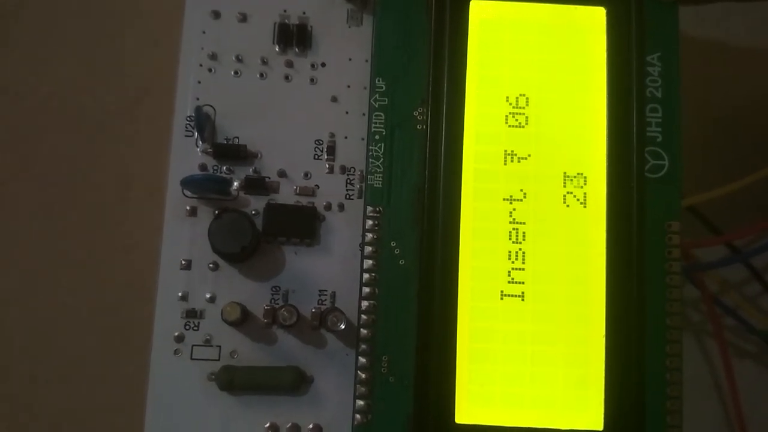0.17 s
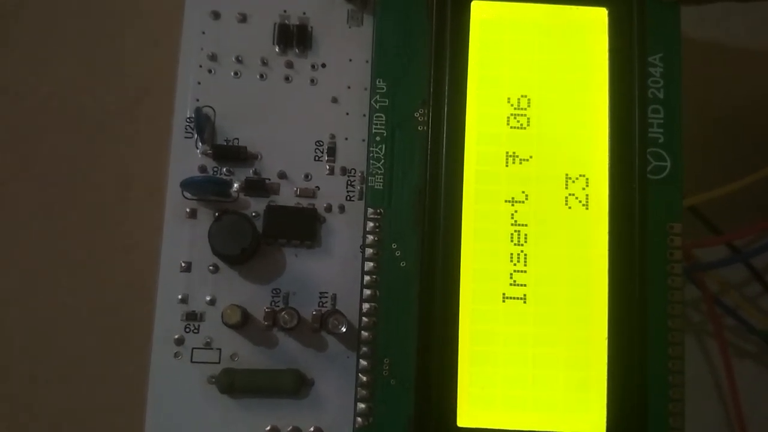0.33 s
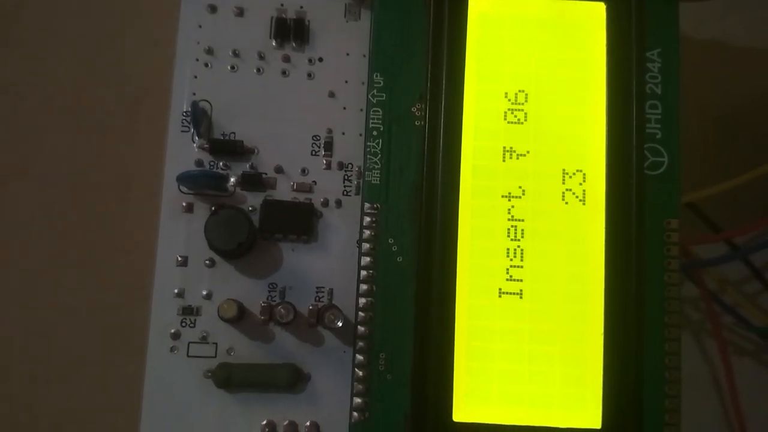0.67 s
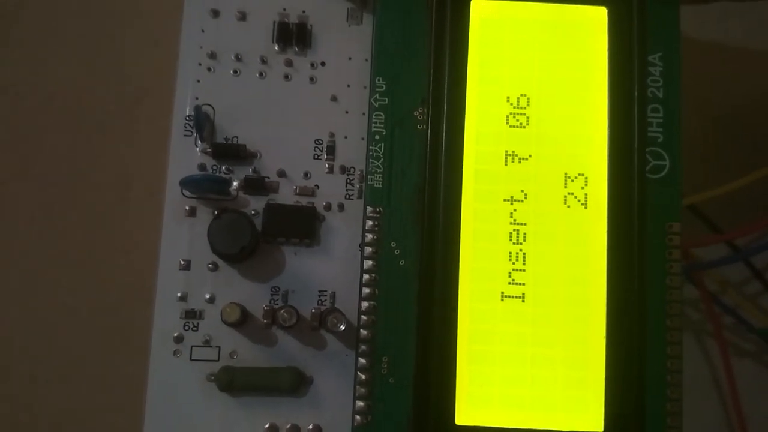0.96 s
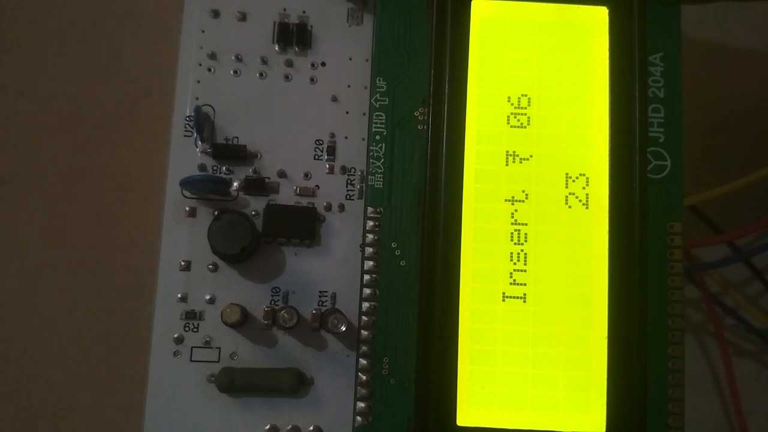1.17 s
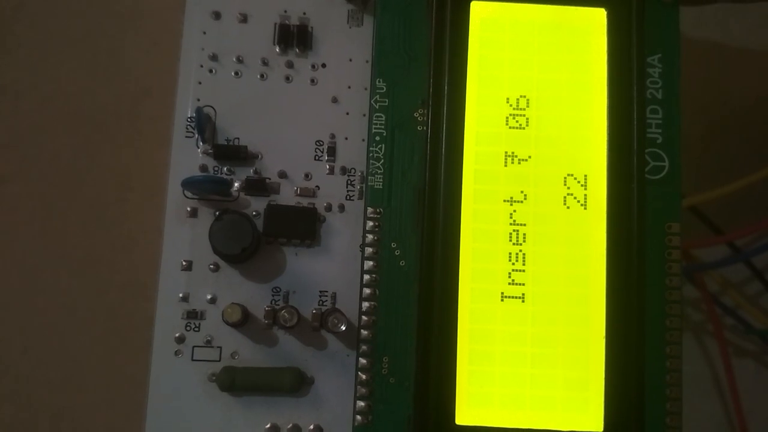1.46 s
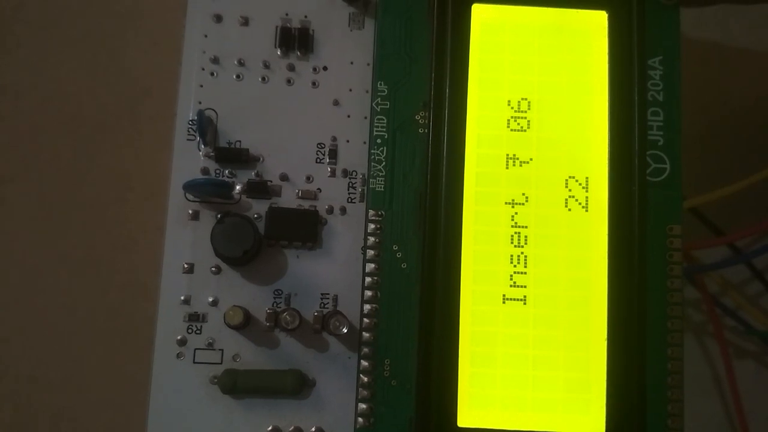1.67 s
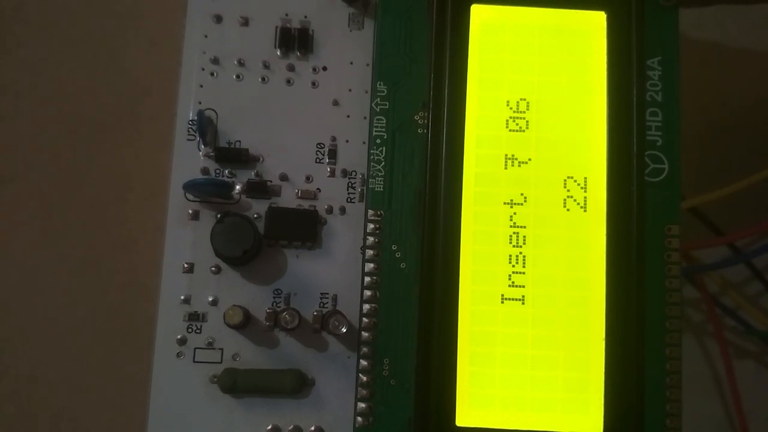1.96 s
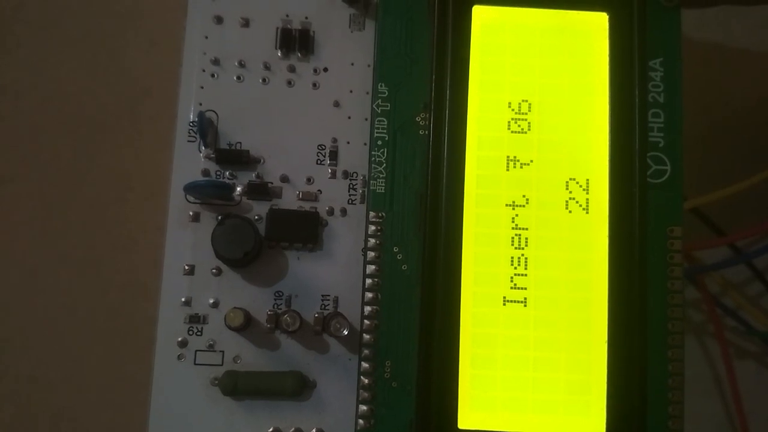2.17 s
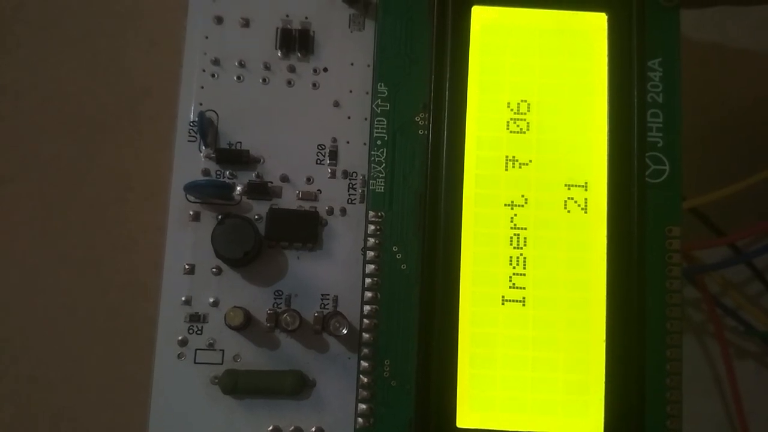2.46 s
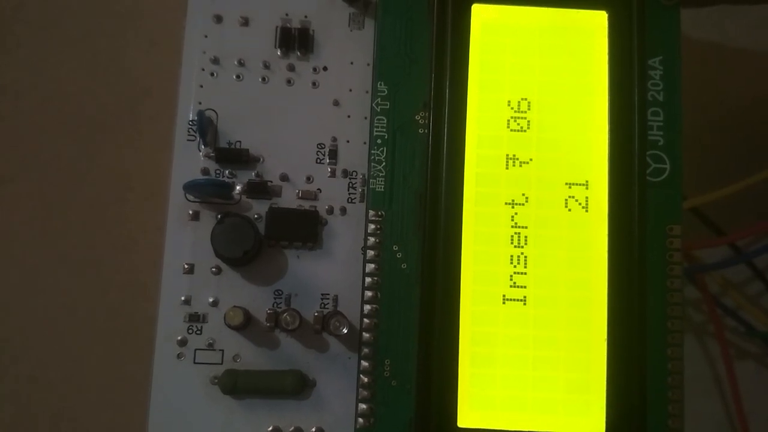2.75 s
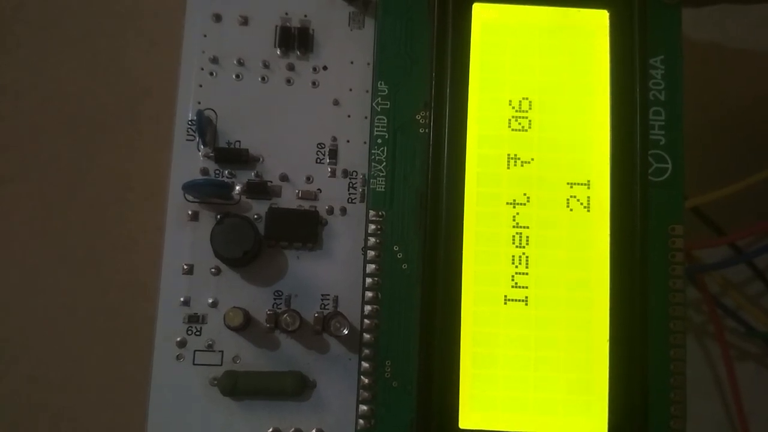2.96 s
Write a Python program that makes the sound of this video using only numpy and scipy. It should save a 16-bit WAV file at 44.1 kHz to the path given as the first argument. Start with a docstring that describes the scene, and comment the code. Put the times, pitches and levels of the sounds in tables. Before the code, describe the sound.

A coin drops through a coin-operated machine: faint scuffs and a dull bump, bright clicks in the metal slot, then a rattle down the chute, a sharp landing and a thin ping. A low hum underlies the small, hard room.

```python
"""Coin into a vending machine

In a small, hard room, over a low steady hum, a coin scuffs faintly, nudges the mechanism and clicks
against the metal slot, then rattles down the chute and lands. Each hit is a blow with a burst of tiny
impacts, coloured by the part it strikes; narrow metallic tones and the room ring on after it.
A last touch on its edge lets the coin itself ring, thin and high."""
import sys
import numpy as np
from scipy import signal
from scipy.fft import rfft, irfft
from scipy.io import wavfile
from scipy.ndimage import uniform_filter1d

SR = 44100
rng = np.random.default_rng(int(sys.argv[2]) if len(sys.argv) > 2 else 0)


def file_out(sig):
    """Save sig as 16-bit WAV at sys.argv[1]."""
    # one column per channel
    cols = np.atleast_2d(sig).T
    # limit, then scale
    lim = np.clip(cols, -1, 1)
    pcm = np.round(lim * 32767).astype(np.int16)
    wavfile.write(sys.argv[1], SR, pcm)


N = 136710
T, HZ = np.arange(N) / SR, np.fft.rfftfreq(N, 1 / SR)

# edges of a hit's four bands (thump, body, middle, treble): f/Hz
BAND_EDGES = [150, 950, 2500, 8000, 17000]
# stereo placement of the slot and of the chute: f/Hz, left minus right/dB
SLOT_PAN = [(60, 1.5), (120, 3.5), (240, 1.5), (480, -6), (950, 1.5), (1890, 4), (3770, 2.5), (7520, -2),
            (15000, -0.5)]
CHUTE_PAN = [(60, 6), (120, 3.0), (240, -1.5), (480, 1), (950, 2.5), (1890, 0.5), (3770, 3), (7520, 0),
             (15000, -2)]


def amp(db):
    """Decibels to gain."""
    return 10 ** (np.asarray(db) / 20)


def unit_rms(x):
    """Scales to an rms of 1."""
    return x / np.sqrt(np.mean(abs(x) ** 2) + 1e-30)


def curve_at(points, hz):
    """Interpolates a curve on a log-frequency axis."""
    f, value = np.transpose(points)
    return np.interp(np.log(hz + 1), np.log(f + 1), value)


def fader(points):
    """Gain over time from points of t/s, gain/dB."""
    return amp(np.interp(T, *np.transpose(points)))


def add(mix, start_s, sound):
    """Mixes a stereo sound in at a time."""
    part = mix[:, max(round(start_s * SR), 0):][:, :sound.shape[1]]
    part += sound[:, :part.shape[1]]


def correlated(noise, likeness):
    """Narrows the image of two unrelated channels; a likeness of 1 is mono."""
    return np.array([noise[0], likeness * noise[0] + np.sqrt(1 - likeness ** 2) * noise[1]])


def panned(db):
    """Left and right gains for a level difference."""
    return amp(np.array([np.atleast_1d(db), -np.atleast_1d(db)]) / 2)


def resonances(peaks, hz):
    """Gain curve of a set of resonant peaks."""
    return np.sqrt(sum(amp(db) ** 2 / (1 + ((hz - f) / width) ** 2) ** 2 for f, width, db in peaks))


def minimum_phase(gain):
    """Gives a gain curve the phase of a passive body: it rings after the blow, never before."""
    log_gain = np.log(np.maximum(gain / gain.max(), 1e-4))
    return np.exp(np.conj(signal.hilbert(np.r_[log_gain, log_gain[-2:0:-1]])))[:len(gain)]


def room_tone(level_db=-66.5, patchy_db=4.8):
    """Faint background air whose lows and mids flicker in patches."""
    # tone of the air: f/Hz, relative level/dB
    spectrum = [(250, -4), (450, -5.5), (680, 3.5), (950, -7), (1150, -2.5), (1450, -2.5), (1950, -15),
                (2600, -27.5), (4000, -33), (9000, -33), (10500, -39), (16000, -34)]
    hz = np.fft.rfftfreq(1024, 1 / SR)[:, None]
    real, imag = rng.standard_normal((2, 2, len(hz), N // 256 + 5))
    patches = uniform_filter1d(rng.standard_normal(real.shape[1:]), size=4, axis=0)
    patches = unit_rms(uniform_filter1d(patches, size=12, axis=1))
    flicker_db = patchy_db * patches / (1 + (hz / 2500) ** 4)
    frames = correlated(real + 1j * imag, likeness=0.27) * amp(curve_at(spectrum, hz) + flicker_db)
    air = signal.istft(frames, nperseg=1024, noverlap=768)[1][:, :N]
    return amp(level_db) * panned(db=1) * unit_rms(air)


def hum(rumble_db=-53, rumble_top_hz=480, waver_depth=0.44, waver_hz=21, deep_top_hz=90):
    """Wavering hum tones in a low rumble; the deepest bass swells and dips."""
    # tone of the rumble: f/Hz, relative level/dB
    spectrum = [(15, -27.5), (25, -17.5), (48, -19), (64, 2.5), (81, -16), (112, 0.5), (135, -7.5),
                (165, -4), (246, 0), (285, -16), (387, -18.5), (430, -22.5), (600, -38), (780, -41),
                (1320, -120)]
    # hum tones ahead of the faders: f/Hz, level/dB
    tones = [(56.8, -60.5), (113.3, -62.5), (165.5, -58.5), (236, -68.5)]
    # fader rides for the deepest bass and for all above it: t/s, gain/dB
    deep_ride = [(0, 3.5), (.25, 10.5), (.33, -18), (.42, -0.5), (.8, 4.5), (1.25, 5.5), (1.55, 1.5),
                 (1.7, 0), (2.1, 7.5), (2.33, 1.5), (2.45, -22), (2.7, -6.5), (3.1, -5)]
    upper_ride = [(0, 2), (1.2, 1), (2.3, 1), (2.5, -7), (3.1, -1.5)]
    noise = correlated(rfft(rng.standard_normal((2, N))), likeness=0.89)
    rumble = noise * amp(curve_at(spectrum, HZ)) / (1 + (HZ / rumble_top_hz) ** 6)
    bed = amp(rumble_db) * unit_rms(irfft(rumble, N))
    for hz, db in tones:
        drift = unit_rms(irfft(rfft(rng.standard_normal((2, N))) * np.exp(-(HZ / waver_hz) ** 2), N))
        waver = 1 + waver_depth * (drift[0] + 1j * drift[1])  # in both level and phase
        tone = np.exp(2j * np.pi * (hz * T + rng.random()))
        bed += amp(db) * np.sqrt(2) * (waver * tone).real
    deep = irfft(rfft(bed) / (1 + (HZ / deep_top_hz) ** 8), N)
    return panned(db=1.35) * (deep * fader(deep_ride) + (bed - deep) * fader(upper_ride))


def room(send, size=32768, build_s=0.005):
    """Hard, close walls: a dense tail of reflections that builds fast and lasts longest in the mids."""
    # reverb time: f/Hz, t60/s
    decay = [(300, 0.17), (1500, 0.43), (3000, 0.4), (7000, 0.33), (12000, 0.35), (16000, .3)]
    # tone of the tail: f/Hz, gain/dB
    colour = [(300, 4), (800, 4.5), (1600, -3.5), (3000, -2), (4100, -2), (5500, -4.5), (7500, -0.5),
              (12000, -1), (16000, -6)]
    hz, t, noise = signal.stft(rng.standard_normal((2, size)), SR, nperseg=256)
    envelope = amp(-60 * t / curve_at(decay, hz)[:, None]) * np.minimum((t + 1e-4) / build_s, 1)
    energy = size * np.mean(envelope ** 2, axis=1, keepdims=True)
    envelope *= amp(curve_at(colour, hz))[:, None] / np.sqrt(energy)
    tail = signal.istft(noise * envelope, SR, nperseg=256)[1]
    return signal.fftconvolve(send, tail, axes=1)[:, :N]


def metallic_ring(send, gain_db=4):
    """Narrow metallic tones that ring on after a hit."""
    # ringing tones: f/Hz, relative gain/dB, t60/s
    tones = [(1427, -3, .5), (1470, 1, .5), (1744, 0, .5), (1825, -2, .5), (1857, -1, .5), (1890, -1, .5),
             (1976, -2, .5), (2021, -1, .5), (2719, 1, .5), (2965, 0, .4), (5520, 1, .3), (11960, 4, .25),
             (12795, 4, .25), (14630, 2, .2)]
    t = np.arange(SR // 2) / SR
    ring = np.zeros_like(t)
    for hz, db, t60 in tones:
        unity_peak = 2 * np.log(1000) / (t60 * SR)
        ring += amp(gain_db + db - 60 * t / t60) * unity_peak * np.cos(2 * np.pi * hz * t)
    return signal.fftconvolve(send, ring[None], axes=1)[:, :N]


def contact(fall_ms, colour, bands, pan, size=4096):
    """A blow amid a dying burst of tiny impacts; returns the lead-in (negative seconds) and the sound."""
    # stereo image of the burst: f/Hz, left-right likeness
    likeness = [(500, 1), (1600, 0.86), (3000, 0.26), (6000, 0.18), (14000, 0.2)]
    rise_ms, right_delay_ms, spot_db = 0.5035, 0.11, 2.7
    sharp_ms = 1.61  # contacts shorter than this are mostly one clean blow
    ms, hz = (np.arange(size) - size // 2) / SR * 1e3, np.fft.rfftfreq(size, 1 / SR)
    phase_per_ms = -2j * np.pi * hz / 1e3
    impacts = rng.choice([-1., 1.], (2, size)) * np.clip(ms / rise_ms, 0, 1) * np.exp(-abs(ms) / fall_ms)
    burst = correlated(rfft(impacts), curve_at(likeness, hz))
    strength = np.sqrt(fall_ms * SR / 2e3)
    blow = rfft(1. * (ms == 0)) * strength * sharp_ms / fall_ms * np.exp(phase_per_ms * rise_ms)
    # each spot struck ripples the body's colour in its own way
    ripple = uniform_filter1d(uniform_filter1d(rng.standard_normal(len(hz)), size=30), size=20)
    spot = amp(spot_db * unit_rms(ripple) * hz / (hz + 2000))
    struck = (blow + burst) * minimum_phase(colour(hz) * spot)
    struck[1] *= np.exp(phase_per_ms * right_delay_ms)
    hit = 0
    for low, high, db in bands:
        band = irfft(struck / np.sqrt((1 + (low / (hz + 1)) ** 14) * (1 + (hz / high) ** 14)))
        hit = hit + amp(db) * strength * band / np.linalg.norm(band, axis=1, keepdims=True)
    gate = np.exp(np.minimum(ms + 1, 0))  # fades out anything sounding ahead of the blow
    return -size / 2 / SR, irfft(rfft(hit) * panned(curve_at(pan, hz))) * gate


def strike(hits, body, edges, pan):
    """Plays hits on one metal part, each with its own band levels and send to room and ring."""
    direct, send = np.zeros((2, 2, N))
    for start_s, *band_db, fall_ms, send_db in hits:
        bands = list(zip(edges, edges[1:], band_db))
        lead_s, hit = contact(fall_ms, lambda hz: resonances(body, hz), bands, pan)
        add(direct, start_s + lead_s, hit)
        add(send, start_s + lead_s, amp(send_db) * hit)
    return direct + room(send) + metallic_ring(send)


def scuffs(grain_db=3, send_db=-7):
    """The coin is handled: its face slides over metal in short, grainy strokes."""
    # strokes: t/s, rise/s, fall/s, level/dB, treble tilt/(dB per octave)
    strokes = [(0.028, 0.057, 0.012, -61.5, 0.5), (.326, 0.0013, 0.0061, -52, 13.5),
               (0.334, 0.041, 0.012, -59, 7), (0.783, 0.016, 0.019, -61.5, 3)]
    # resonances of the scuffed metal: f/Hz, half-width/Hz, gain/dB
    metal = [(3070, 230, 0), (3720, 95, -5.5), (4730, 100, -1), (5520, 110, 3.5), (6220, 200, -7),
             (7300, 390, -11.5), (8300, 180, -6), (9240, 210, -1.5), (10300, 250, -2.5), (11100, 270, -2.5),
             (11900, 200, -0.5), (13540, 250, 1.5), (14900, 700, -7.5)]
    direct = np.zeros((2, N))
    for start_s, rise_s, fall_s, db, tilt_db in strokes:
        grains = rng.standard_normal((2, N)) * amp(grain_db * rng.standard_normal(N))
        tilt = amp(tilt_db * np.log2(HZ / SR + .01))
        hiss = unit_rms(irfft(rfft(grains) * resonances(metal, HZ) * tilt, N))
        age = T - start_s
        envelope = np.clip(age / rise_s, 0, 1) * np.exp(-np.maximum(age - rise_s, 0) / fall_s)
        direct += amp(db) * hiss * envelope
    return direct + amp(send_db) * room(direct)


def mechanism_nudges():
    """Two dull bumps against the coin mechanism."""
    # bumps: t/s, body/dB, middle/dB, fall/ms, send/dB
    nudges = [(1.3712, -46.5, -53.5, 3.5, -2), (1.4535, -60, -64, 5.3, -10)]
    # resonances of the mechanism: f/Hz, half-width/Hz, gain/dB
    mechanism = [(1770, 170, 4), (2590, 52, 2.5), (2950, 100, -0.5), (3830, 55, -4), (5260, 160, -10.5)]
    return strike(nudges, mechanism, BAND_EDGES[1:-1], SLOT_PAN)


def slot_clicks():
    """The coin clicks brightly against the metal slot."""
    # clicks: t/s, body/dB, middle/dB, treble/dB, fall/ms, send/dB
    clicks = [(1.7071, -42.5, -31, -27, 4.9, 2), (1.7230, -41.5, -49, -28.5, 2.8, -2.5),
              (1.8215, -34, -36.5, -41.5, 9.7, -3), (1.8285, -32, -42, -54, 2.1, -8.5),
              (1.9628, -59, -50.5, -66, 6.1, -5.5), (2.0362, -45, -40.5, -40, 3.3, -2)]
    # resonances of the slot: f/Hz, half-width/Hz, gain/dB
    slot = [(1600, 126, 6), (2135, 140, 5.5), (3007, 260, 9), (4040, 350, 7.5), (4790, 52, 12),
            (5485, 170, 9.5), (6080, 430, 2), (7790, 340, 1), (8460, 64, 7), (9260, 340, -2),
            (10840, 300, -1), (11830, 190, -1.5), (12750, 290, -4), (12400, 280, -5.5), (14400, 300, 3),
            (15330, 200, -8.5)]
    return strike(clicks, slot, BAND_EDGES[1:], SLOT_PAN)


def coin_ping(start_s=2.8965, tick_db=-28, ring_db=-32, tick_send_db=-4.5, ring_send_db=-12):
    """A last touch on the coin's edge: a thin tick, then its close modes ring freely and beat."""
    # tone of the tick: f/Hz, relative level/dB
    tick_colour = [(3000, -48.5), (5200, -14), (6300, 8.5), (8000, 4.5), (9500, -3), (11200, 10),
                   (13000, 4.5), (15500, 4.5)]
    # the coin's own modes: f/Hz, relative level/dB, t60/s
    modes = [(10990, -19, .18), (11120, 0, .19), (11190, 0, .08), (11290, -10, .18), (11560, -11, .19),
             (11640, -9, .15)]
    tick, ring = np.zeros((2, 2, N))
    lead_s, touch = contact(fall_ms=2.2, colour=lambda hz: amp(curve_at(tick_colour, hz)),
                            bands=[(BAND_EDGES[0], BAND_EDGES[-1], tick_db)], pan=CHUTE_PAN)
    add(tick, start_s + lead_s, touch)
    t = np.arange(SR // 2) / SR
    for hz, db, t60 in modes:
        mode = amp(ring_db + db - 60 * t / t60) * np.sin(2 * np.pi * hz * t)
        add(ring, start_s, panned(db=-6.5) * mode)
    return tick + ring + room(amp(tick_send_db) * tick + amp(ring_send_db) * ring)


def chute_rattle():
    """The coin knocks its way down the chute and lands."""
    # knocks: t/s, thump/dB, body/dB, middle/dB, treble/dB, fall/ms, send/dB
    knocks = [(2.099, -92, -32, -32.5, -46, 5.1, -5.5), (2.1444, -99, -44, -47.5, -51, 22, 1),
              (2.1873, -71, -36.5, -35.5, -44, 9, -23), (2.2042, -46, -20, -24, -26.5, 5, -1.5),
              (2.222, -45, -21.5, -26, -49, 4, -26), (2.237, -51, -32, -33.5, -44, 3.7, 3.5),
              (2.2726, -52.5, -33, -42.5, -43.5, 3, -1.5), (2.3799, -80, -47, -70, -63, 36, 11.5),
              (2.4008, -65.5, -38, -63.5, -54, 7, -4.5), (2.4168, -67.5, -25, -30, -34.5, 7.1, -17),
              (2.4325, -66, -38.5, -32, -34.5, 5.7, 2), (2.4450, -75, -35, -54, -28.5, 8.9, -8.5),
              (2.5031, -38.5, -5, -14.5, -14.5, 2.3, -6.5), (2.5267, -44.5, -41.5, -20.5, -18, 1.22, 7.5),
              (2.5288, -34, -14.5, -19, -12.5, 2.3, -6), (2.5422, -53, -35, -34, -27, 3, -6.5),
              (2.6238, -42, -26.5, -33, -59, 2.4, -6), (2.6907, -48, -30.5, -28, -52, 4.2, -2),
              (2.7675, -78.5, -43.5, -65, -57, 26, -2), (2.795, -77, -64, -55.5, -55.5, 19, -1.5),
              (2.8244, -73, -38.5, -51, -77.5, 4.8, -19)]
    # resonances of the chute: f/Hz, half-width/Hz, gain/dB
    chute = [(380, 130, -23), (784, 64, -17), (1170, 110, -7.5), (1527, 148, 5), (1736, 154, 5.5),
             (2090, 170, 0), (2648, 59, -6), (3077, 350, -8), (3640, 260, -13.5), (4710, 600, -15),
             (5250, 130, -10), (5870, 300, -16), (7060, 460, -17.5), (8130, 1100, -24.5), (10160, 430, -17),
             (11550, 1100, -16.5), (13100, 1100, -16.5), (13800, 680, -24), (14800, 620, -17.5)]
    return strike(knocks, chute, BAND_EDGES, CHUTE_PAN)


def scene():
    """The coin's way through the machine, over hum and room tone."""
    coin = mechanism_nudges() + slot_clicks() + chute_rattle() + scuffs() + coin_ping()
    return coin + hum() + room_tone()


def record(dry, ceiling=0.9, cutoff_hz=15900):
    """A soft clip rounds off the highest peak; a steep low-pass trims the top."""
    rounded = dry / (1 + (dry / ceiling) ** 6) ** (1 / 6)
    lowpass = signal.firwin(301, cutoff_hz, window=("kaiser", 9), fs=SR)
    return signal.oaconvolve(rounded, lowpass[None], "same")


dry = scene()
out = record(dry)
file_out(out)
```